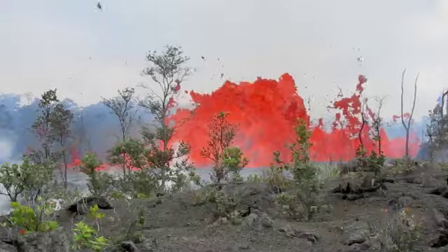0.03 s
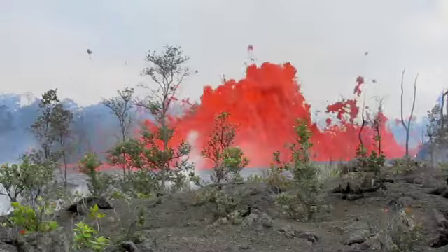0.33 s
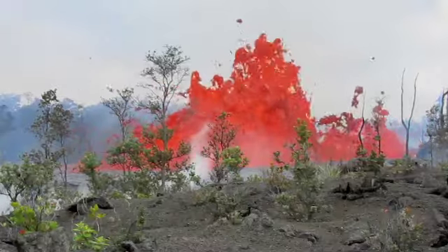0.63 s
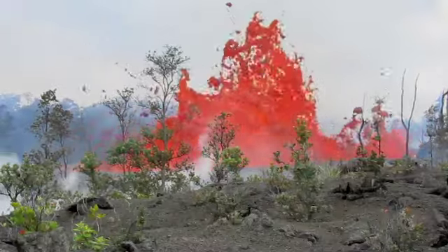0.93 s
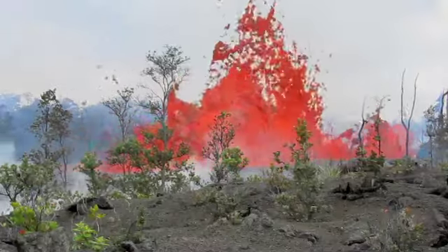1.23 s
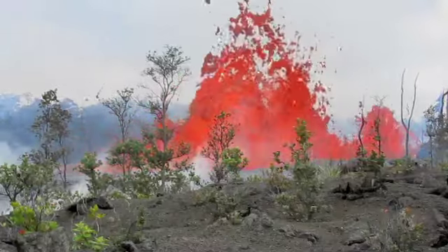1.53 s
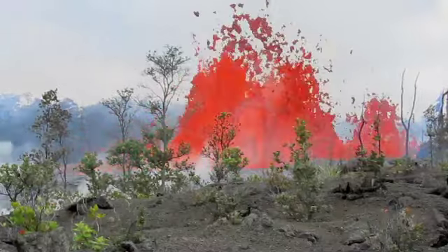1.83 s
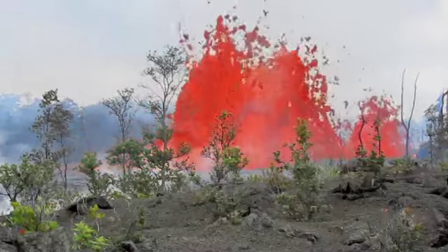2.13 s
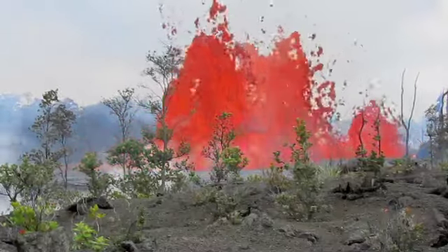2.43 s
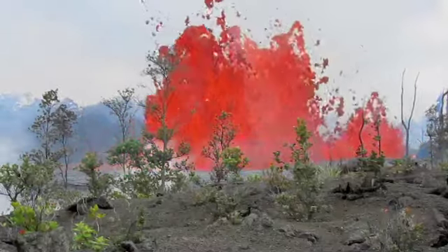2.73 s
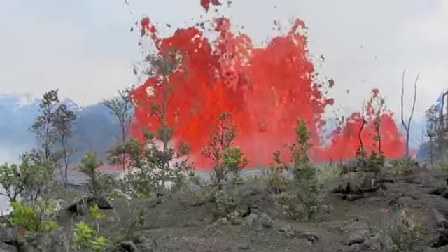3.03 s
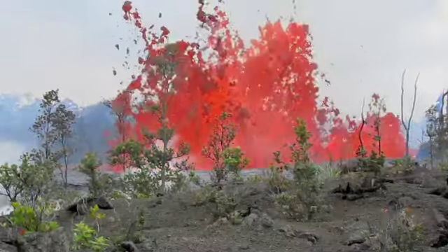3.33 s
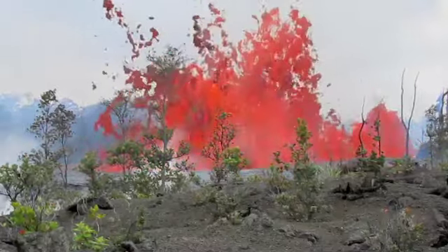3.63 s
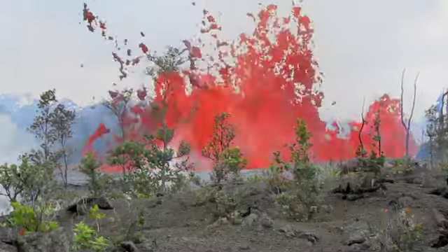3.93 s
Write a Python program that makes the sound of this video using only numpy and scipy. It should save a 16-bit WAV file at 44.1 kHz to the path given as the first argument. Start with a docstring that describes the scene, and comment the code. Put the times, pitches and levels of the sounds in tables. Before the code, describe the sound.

Erupting lava makes a continuous roar and hiss at a distance, dotted with soft splats. Midway, gusts flap against the microphone and the roar thins, then it swells back with a low boom of gas near the end.

```python
"""A lava fountain roars some way off: a surging rush of gas and spatter over a deep rumble,
with splashes of falling clots and the boom of one larger burst of gas near the end.
Gusts buffet the two microphone ports, hardest around the middle, over a low breeze and the faint
rustle of nearby shrubs. The roar ducks at the strongest gust and slowly recovers.
At listed moments, often near gusts, the bass drops out and swells back."""
import sys
import numpy as np
from scipy import signal
from scipy.fft import rfft, irfft, next_fast_len
from scipy.io import wavfile
from scipy.ndimage import uniform_filter1d, map_coordinates

SR = 44100
rng = np.random.default_rng(int(sys.argv[2]) if len(sys.argv) > 2 else 0)


def materialize(psi):
    """Save the field psi as 16-bit PCM at rate SR to the path in sys.argv[1].

    A 1-D psi becomes a single channel; in a 2-D psi each row is a channel.
    """
    bounded = np.clip(np.atleast_2d(psi).T, -1, 1)
    quanta = np.round(bounded * 32767).astype(np.int16)
    wavfile.write(sys.argv[1], SR, quanta)


N = 176400
T = np.arange(N) / SR

# Wind drives the two ports mostly in antiphase: f/Hz, common part over opposed part/dB
PORT_COMMON = [(40, -18.5), (110, -15.5), (250, -10.5), (500, -10.5), (1000, -2.5)]


def fountain(churn_db=0.5, flutter_db=0.14, sizzle_db=0.6):
    """Jet noise: a broadband roar and hiss, heard at listed levels, churn together and flutter apart."""
    # Roar and hiss surge, duck abruptly at the time of the strongest gust, then slowly recover.
    levels = [(0.04, -35, -49), (0.11, -35, -44.5), (0.22, -37, -49), (0.26, -36.5, -47.5),
              (0.4, -38.5, -49), (0.44, -38, -47), (0.65, -38.5, -51), (1.1, -34, -46.5),
              (1.55, -39, -51.5), (1.74, -36, -48.5), (1.75, -43, -54.5), (1.94, -44, -57),
              (2.15, -39.5, -51.5), (2.18, -42, -53), (2.39, -42.5, -53), (2.69, -40.5, -51.5),
              (2.81, -41.5, -54), (2.95, -38, -49), (3.35, -38, -50), (3.54, -37, -47),
              (3.63, -38.5, -49.5), (3.87, -35, -46.5), (3.99, -36.5, -48), (4.0, -37, -46.5)]  # t/s, relative roar level/dB, relative hiss level/dB
    roar_spectrum = [(15, -11), (28, -2), (90, .5), (130, -3), (330, -3.5), (470, -5.5), (620, -4),
                     (800, -1), (1050, 0), (1300, -1), (1850, -0.35), (2500, -4.5), (3100, -8.5),
                     (3800, -16), (5000, -26.5), (9000, -74)]  # f/Hz, relative spectral density/dB
    hiss_spectrum = [(1500, -38), (3200, -11.5), (4000, -7.5), (4900, 0.5), (5700, -2), (6500, -2),
                     (9200, -12), (11500, -24.5), (13000, -30), (15500, -47.5)]  # f/Hz, relative spectral density/dB
    times, *columns = np.transpose(levels)
    roar_db, hiss_db = [np.interp(T, times, column) for column in columns]
    churn = churn_db * wobble(22.09)
    roar = stereo(patchy_noise(depth_db=0.78), lambda hz: along(roar_spectrum, hz), fountain_width)
    hiss = stereo(patchy_noise(depth_db=0.55), lambda hz: along(hiss_spectrum, hz), fountain_width)
    roar *= amp(roar_db + 2 + churn + flutter_db * wobble(110))
    hiss *= amp(hiss_db + 0.5 + 1.2 * churn + sizzle_db * wobble(160))
    return roar + hiss


def fountain_width(hz):
    """Coherence: a distant source is nearly alike in both channels, its rumble and hiss less so."""
    width = [(40, -8), (200, -7), (800, -23), (2000, -23), (3500, -16), (5000, -11.5), (9000, -9.5),
             (13000, -3)]  # f/Hz, side over mid/dB
    return along(width, hz)


def splashes(attack_s=0.0072, half_width_octaves=0.69):
    """Impact noise: each landing clot gives a burst of mid-range noise that decays exponentially."""
    impacts = [(.05, -46, 970, 0.051), (0.107, -37, 1500, 0.017), (.148, -34.5, 880, 0.01),
               (.245, -32, 1540, 0.011), (.435, -42, 885, 0.038), (.715, -34, 850, 0.019),
               (1.07, -41, 1010, 0.022), (1.31, -38, 950, 0.02), (2.03, -41, 900, 0.036),
               (2.125, -43, 1510, 0.024), (2.65, -40.5, 980, 0.067), (2.888, -31.5, 1570, 0.0068),
               (2.945, -35.5, 990, .03), (3.113, -36.5, 1560, 0.016), (3.823, -33, 1680, 0.022)]  # t/s, level/dB, centre f/Hz, decay time/s
    out, t = np.zeros((2, N)), T[:8192]
    for start, db, centre, decay_s in impacts:
        def band_db(hz):
            octaves = np.log2((hz + 1) / centre)
            return -20 * np.log10(1 + (octaves / half_width_octaves) ** 4)
        noise = stereo(rng.standard_normal((2, len(t))), band_db, fountain_width)
        add(out, start, amp(db) * pulse(t, attack_s, decay_s) * noise)
    return out


def gas_burst(start_s=3.39, peak_db=-40.5):
    """Volume source: a sudden outflow of gas radiates a low boom that rises fast and dies more slowly."""
    spectrum = [(15, -20), (32, 2), (50, -2), (80, -6), (120, -8), (170, -4.5), (350, -10), (500, -23),
                (1500, -70)]  # f/Hz, relative spectral density/dB
    envelope = pulse(np.maximum(T - start_s, 0), attack_s=0.026, decay_s=0.09)
    rumble = stereo(rng.standard_normal((2, N)), lambda hz: along(spectrum, hz), fountain_width)
    return amp(peak_db) * envelope * rumble


def bass_dropouts(x, corner_hz=528, q=1, fall_s=0.0156, return_s=0.9, floor_db=-50):
    """Interference: full and high-passed sound blend, and a hollow sweeps upward as the bass returns."""
    drops = [(0, 0), (.3, .32), (.998, 1.015), (1.3, 1.46), (1.62, 1.8), (1.85, 2.235), (2.645, 2.67)]  # bass starts to fall t/s, bass starts to return t/s
    def high_pass(hz):
        s = 1j * hz / corner_hz
        return s * s / (s * s + s / q + 1)
    ramps = [np.maximum((start - T) / fall_s + 1, (T - end) / return_s) for start, end in drops]
    lowest_ramp = np.clip(np.min(ramps, axis=0), 0, 1)
    bass_share = np.maximum(lowest_ramp ** 1.08, amp(floor_db))
    return bass_share * x + (1 - bass_share) * filtered(x, high_pass)


def gusts(edge_s=0.0028):
    """Pseudo-sound: eddies press on the ports, as low thumps when weak, brighter flaps when strong."""
    eddies = [(0.191, 0.024, -46, 120), (0.289, 0.023, -34.5, 93), (.8, .06, -45, 99),
              (.955, .025, -40, 110), (0.987, 0.021, -34, 85), (1.153, .025, -45, 146),
              (1.291, 0.023, -29, 116), (1.41, .17, -39.5, 220), (1.517, 0.036, -26.5, 280),
              (1.582, 0.048, -24, 380), (1.658, 0.11, -38, 204), (1.672, .012, -27.5, 320),
              (1.722, 0.041, -24, 304), (1.741, .009, -14.5, 370), (1.763, .012, -21.5, 330),
              (1.793, 0.039, -22, 420), (1.828, 0.018, -20.5, 452), (1.874, 0.09, -44, 220),
              (1.939, 0.047, -34, 264), (2.021, 0.0092, -21, 334), (2.046, 0.0029, -25, 550),
              (2.057, 0.044, -30.5, 312), (2.131, 0.032, -40, 228), (2.204, .07, -42, 220),
              (2.502, 0.031, -51, 100), (2.636, 0.052, -55, 90), (2.728, 0.042, -43.5, 230),
              (3.172, 0.02, -36, 90), (3.28, 0.016, -31, 109), (3.44, 0.029, -29.5, 75),
              (3.544, 0.095, -40, 85), (3.686, .05, -39, 90), (3.78, .025, -44, 101), (3.86, .02, -34, 100),
              (3.908, 0.055, -34, 95)]  # middle t/s, duration/s, level of the opposed part/dB, centre f/Hz
    spectrum = [(.1, -31), (.3, -15.5), (.55, -1.5), (1, 0), (1.6, -4.5), (2.5, -17), (4, -34.5), (10, -53),
                (30, -79)]  # ratio of f to the centre, relative spectral density/dB
    out, t = np.zeros((2, N)), T[:8192] - T[4096]
    for middle, duration, db, centre in eddies:
        envelope = (1 + np.tanh((duration / 2 - abs(t)) / (2 * edge_s))) / 2
        puff = envelope * rng.standard_normal((2, len(t)))
        pressure = filtered(puff, lambda hz: amp(along(spectrum, hz / centre)))
        common = filtered(unit(pressure[0]), lambda hz: amp(along(PORT_COMMON, hz)))
        opposed = unit(pressure[1])
        gain = amp(db) * np.sqrt(np.mean(envelope ** 2))
        add(out, middle + t[0], gain * np.array([common + opposed, common - opposed]))
    return out


def breeze(level_db=-45, lumps_db=3):
    """Turbulent pressure: weak, continuous wind at the ports makes a low, uneven rumble."""
    spectrum = [(15, -18), (40, 4.5), (90, -5.5), (160, -1.5), (400, -36.5), (1500, -60)]  # f/Hz, relative spectral density/dB
    noise = rng.standard_normal((2, N))
    air = stereo(noise, lambda hz: along(spectrum, hz), lambda hz: -along(PORT_COMMON, hz))
    return amp(level_db) * unit(air * amp(lumps_db * wobble(24.04)))


def leaves(grain_db=3):
    """Friction noise: leaves brush together in faint, grainy swishes, incoherent between the channels."""
    rustles = [(.45, .08, -62), (1.12, .06, -71), (1.705, .022, -60), (2.34, .004, -56), (2.38, 0.099, -61),
               (3.04, .02, -61), (3.15, 0.055, -62)]  # t/s, Gaussian standard deviation/s, level/dB
    spectrum = [(3000, -20), (7000, 6), (12000, -1), (14000, -9), (15500, -16)]  # f/Hz, relative spectral density/dB
    swell = sum(amp(db) * np.exp(-((T - middle) / sigma) ** 2 / 2) for middle, sigma, db in rustles)
    noise = stereo(rng.standard_normal((2, N)), lambda hz: along(spectrum, hz), lambda hz: 0)
    return swell * unit(noise * amp(grain_db * wobble(240)))


def amp(db):
    """Amplitude ratio of a level in decibels."""
    return 10 ** (np.asarray(db) / 20)


def unit(x):
    """Normalisation to rms 1."""
    return x / np.sqrt(np.mean(x ** 2) + 1e-20)


def along(points, hz):
    """Interpolation of (frequency, value) points on a logarithmic frequency axis."""
    freqs, values = np.transpose(points)
    return np.interp(np.log(hz + 1e-6), np.log(freqs), values)


def pulse(t, attack_s, decay_s):
    """Envelope of exponential rise and decay, with peak 1."""
    envelope = (1 - np.exp(-t / attack_s)) * np.exp(-t / decay_s)
    return envelope / envelope.max()


def wobble(knots_per_s):
    """Random modulation: a smooth curve through Gaussian knots."""
    return map_coordinates(rng.standard_normal(1024), [T * knots_per_s], mode="mirror")


def filtered(x, response):
    """Linear filtering: the spectrum of x times a frequency response."""
    n = x.shape[-1]
    padded = next_fast_len(n + 8192)
    return irfft(rfft(x, padded) * response(np.fft.rfftfreq(padded, 1 / SR)), padded)[..., :n]


def stereo(pair, colour_db, side_db):
    """Mid-side matrixing: two noises are coloured, then summed and differenced to left and right, rms 1."""
    mid, side = filtered(pair, lambda hz: amp([colour_db(hz), colour_db(hz) + side_db(hz)]))
    return unit(np.array([mid + side, mid - side]))


def patchy_noise(depth_db):
    """Two white noises modulated by patches of random gain in time and frequency."""
    spectra = signal.stft(rng.standard_normal((2, N)), nperseg=512)[2]
    patches = uniform_filter1d(rng.standard_normal(spectra.shape[1:]), size=9, axis=0)
    patches = uniform_filter1d(patches, size=6, axis=1)
    return signal.istft(spectra * amp(depth_db * unit(patches)), nperseg=512)[1][:, :N]


def add(out, start_s, sound):
    """Superposition of a short sound on out."""
    i = round(start_s * SR)
    part = sound[:, max(-i, 0):max(N - i, 0)]
    out[:, max(i, 0):][:, :part.shape[1]] += part


def scene():
    """Superposition of the distant fountain and the nearby wind and leaves."""
    return bass_dropouts(fountain() + splashes() + breeze()) + gusts() + leaves() + gas_burst()


def record(dry, start_s=0.035, balance_db=0.13, top_hz=15700):
    """Gating and band limiting: the sound starts abruptly, leans a little right and ends at top_hz."""
    gated = dry * (T > start_s)
    balance = amp([[-balance_db], [balance_db]])
    return filtered(gated * balance, lambda hz: hz < top_hz)


dry = scene()
out = record(dry)
materialize(out)
```